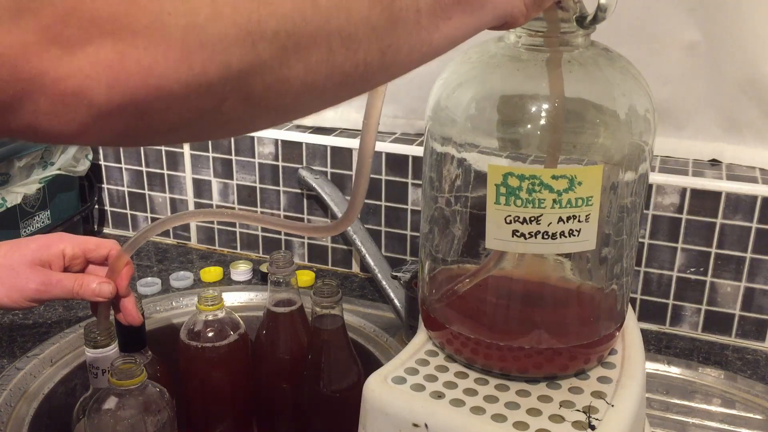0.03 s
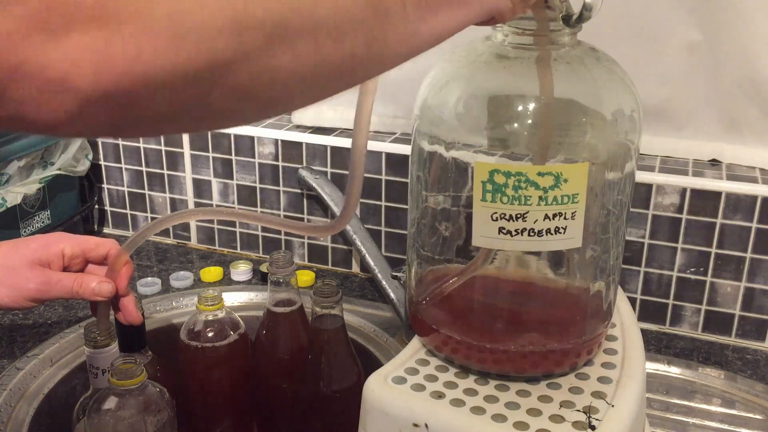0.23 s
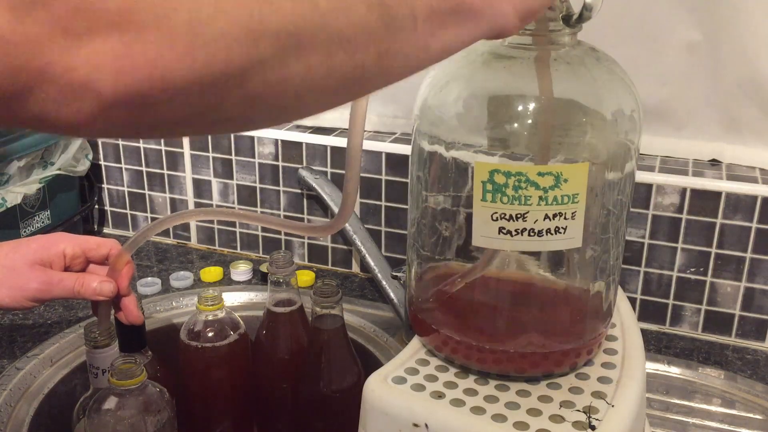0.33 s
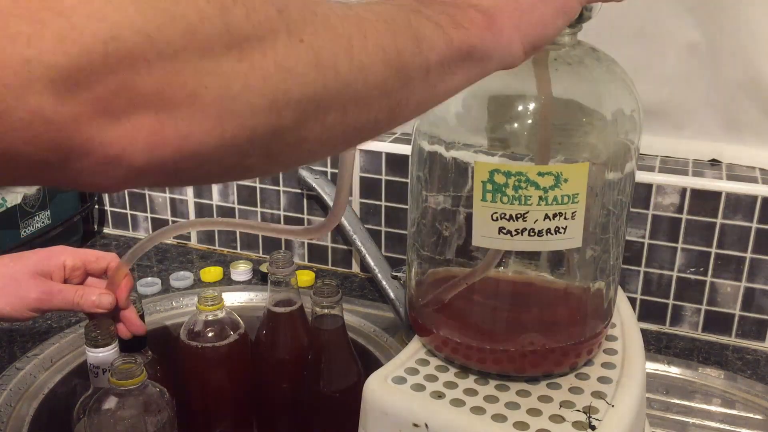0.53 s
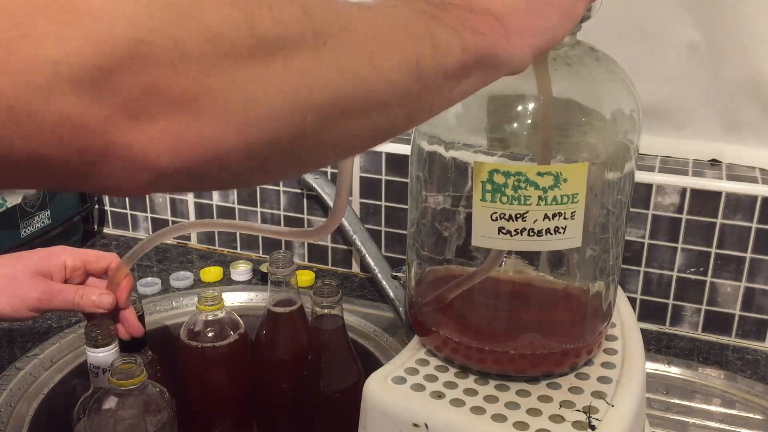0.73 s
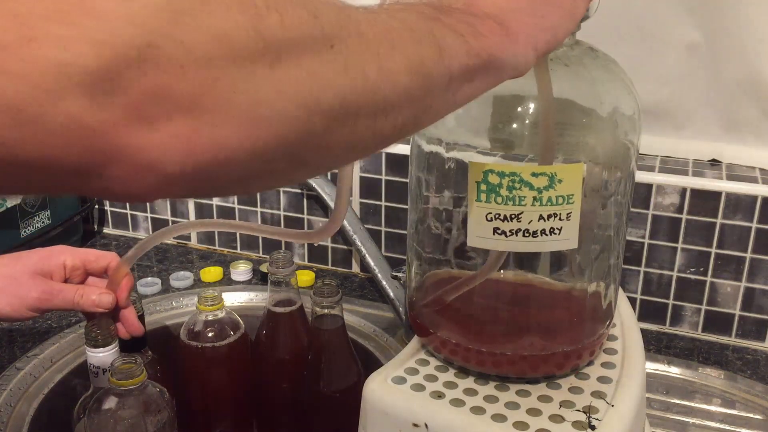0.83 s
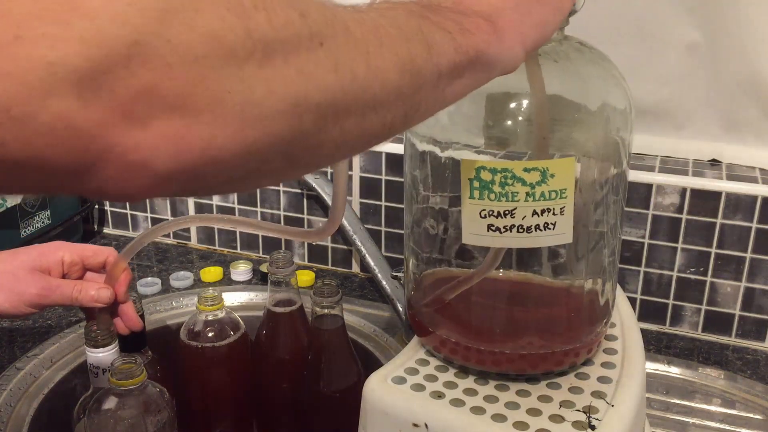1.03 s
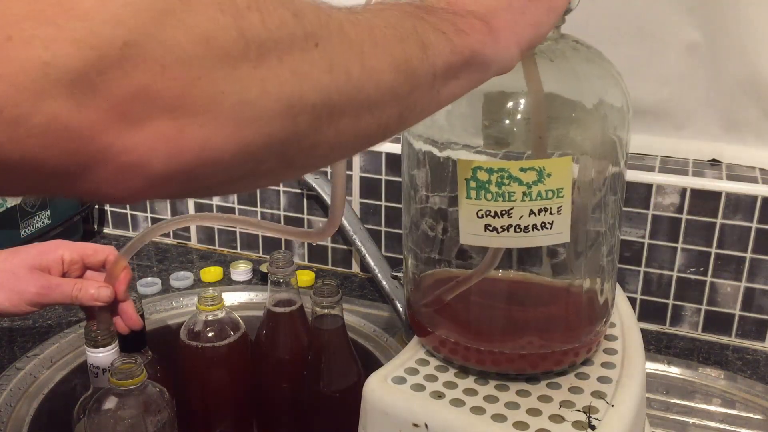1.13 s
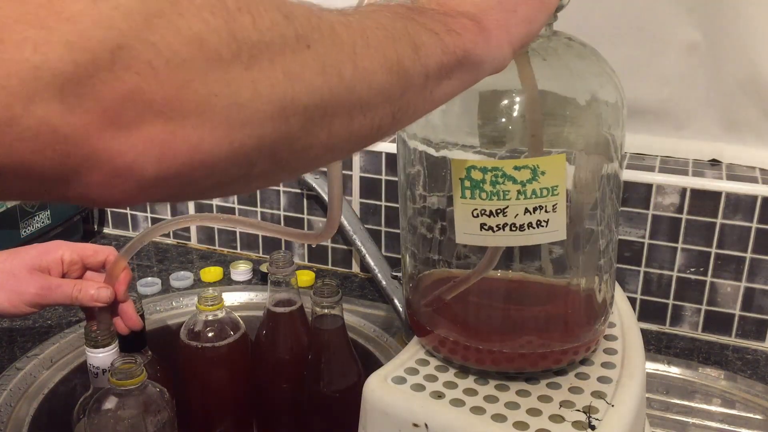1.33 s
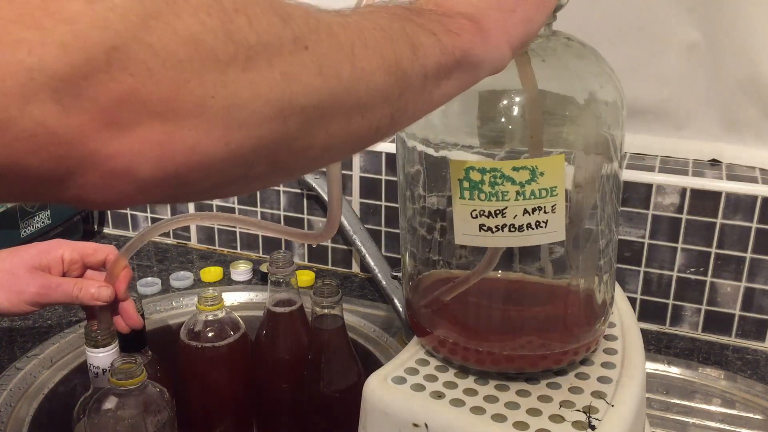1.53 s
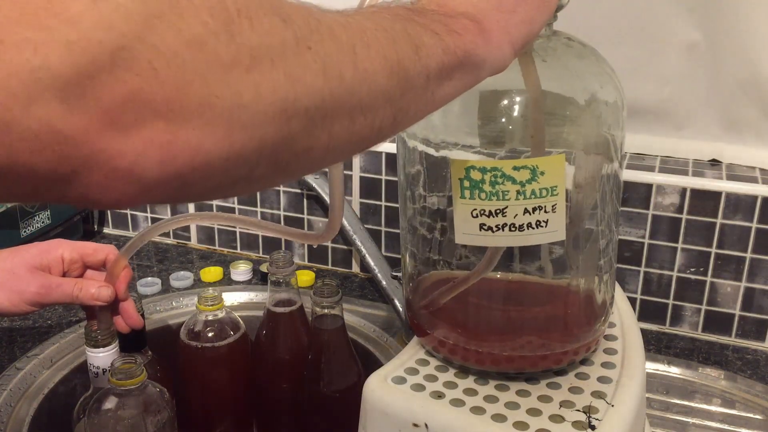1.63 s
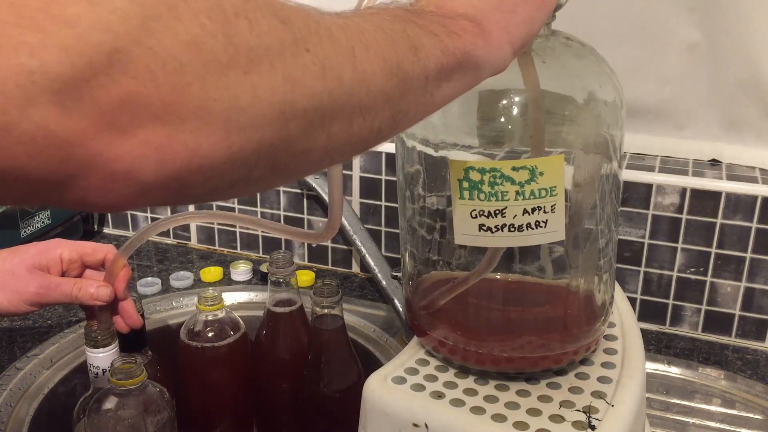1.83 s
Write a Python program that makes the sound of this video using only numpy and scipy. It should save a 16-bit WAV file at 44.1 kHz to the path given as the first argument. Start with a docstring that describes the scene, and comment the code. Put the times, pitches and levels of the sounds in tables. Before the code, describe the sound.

A siphon tube gives one soft, hollow bump in a glass jar, then slips against the glass in tiny scraping ticks. A hand brushes faintly. The sounds are close and dry, over a quiet kitchen appliance hum.

```python
"""A siphon tube in a glass jar

In a quiet kitchen, an appliance hums on one steady note over a low murmur and faint hiss.
Someone holds a siphon tube in a jar: one soft, hollow bump, then two thin, wet crackles.
The tube slips and rubs the glass into tiny scraping ticks, and the hand shifts its grip."""
import sys
import numpy as np
from scipy import signal
from scipy.fft import rfft, irfft
from scipy.io import wavfile

SR = 44100
rng = np.random.default_rng(int(sys.argv[2]) if len(sys.argv) > 2 else 0)


def store_wav(level_fs):
    """Save 16-bit WAV to argv[1]."""
    pcm = np.round(np.clip(np.atleast_2d(level_fs), -1, 1) * 32767)
    wavfile.write(sys.argv[1], SR, pcm.T.astype(np.int16))


N = 83790


def undb(db):
    """Turn decibels (dB) into a number to multiply a sound by."""
    return 10 ** (np.asarray(db) / 20)


def noise(gain):
    """Noise with an overall strength of 1; gain(Hz) sets the share of each frequency."""
    hz = np.maximum(np.arange(N // 2 + 1) * SR / N, 1)
    shaped = irfft(rfft(rng.standard_normal(N)) * gain(hz), N)
    return shaped / np.std(shaped)


def band(hz, width_hz):
    """Noise gathered around one pitch, falling off steeply on both sides."""
    return noise(lambda f: 1 / (1 + ((f * f - hz * hz) / (f * width_hz * 2)) ** 2 * 2))


def wander(rate_hz):
    """A random drift, about 1 in size; a higher rate moves faster."""
    return noise(lambda f: 1 / (1 + (f / rate_hz) ** 2))


def swell(t, rise_s, decay_s, round_s):
    """The loudness of a soft touch: it grows to a rounded peak at t = 0, then dies away."""
    return np.exp(-(np.hypot(t, round_s) - round_s) / np.where(t < 0, rise_s, decay_s))


def tone(t, hz):
    """A pure tone that starts anywhere in its cycle."""
    return np.sin(2 * np.pi * (hz * t + rng.random()))


def appliance_hum(t):
    """An appliance holds one steady note, with two quieter, wavering tones beside it."""
    # Each row: pitch in Hz, level in dB, how far the pitch wavers in Hz.
    hum_tones = [(258.2, -55, 0.23), (100.2, -62.5, 5.83), (386.7, -71, 7.75)]
    hum = np.zeros(N)
    for hz, db, waver_hz in hum_tones:
        drift_s = np.cumsum(waver_hz * wander(13.23)) / SR / hz
        strength = undb(db + 0.93 * wander(2.2))
        hum += np.sqrt(2) * strength * tone(t + drift_s, hz)
    return hum


def murmur():
    """A low murmur: noise gathered around three pitches."""
    # Each row: pitch in Hz, width in Hz, level in dB.
    resonances = [(162, 27, -67), (381.4, 54, -79), (534.2, 10, -77)]
    return sum(undb(db) * band(hz, width_hz) for hz, width_hz, db in resonances)


def room_air():
    """The room's air: a faint rumble and hiss whose level flickers slightly."""
    # Each row: frequency in Hz, level in dB compared with the other rows.
    air_shape = [(18, 0), (40, 0.5), (75, 5), (270, 1.5), (325, -4), (460, -5), (720, -3), (1050, -7.5),
                 (1550, -10), (2900, -10.5), (4300, -15), (4900, -18), (5400, -16.5), (6600, -17.5),
                 (7650, -21.5), (8400, -19.5), (9700, -20.5), (10400, -26.5), (11200, -22.5),
                 (15500, -26.5)]
    hz, db = np.array(air_shape).T
    air = noise(lambda f: undb(np.interp(np.log(f), np.log(hz), db)))
    return air * undb(-58.5 + 0.5 * wander(17))


def jar_bump(t):
    """A padded knock makes the jar ring briefly, with a deep thud and a slight scuff."""
    # Each row is one ringing tone: pitch in Hz, relative level in dB, rise and decay in seconds.
    jar_tones = [(237, -1, 0.0069, 0.0048), (183.5, -12.5, 0.0099, 0.0059), (296, -14, 0.0038, 0.011),
                 (389, -19, 0.011, 0.0029), (474, -29, 0.0087, 0.0076), (582, -29.5, 0.003, 0.0038),
                 (673, -27, 0.0027, 0.0051), (935, -31.5, 0.0066, 0.0046), (1105, -30.5, 0.0056, 0.0024),
                 (1226, -30.5, 0.0042, 0.0097)]
    peak_s, round_s, thud_hz = 0.2203, 0.0035, 47
    t = t - peak_s
    body = np.zeros(N)
    for hz, db, rise, decay in jar_tones:
        # Low tones move together with the push; higher ones ring freely.
        ring = np.cos(2 * np.pi * hz * t) if hz < 350 else tone(t, hz)
        body += undb(db) * swell(t, rise, decay, round_s) * ring
    thud = swell(t - 0.008, 0.014, 0.015, round_s) * np.sin(2 * np.pi * thud_hz * t)
    scuff = swell(t, 0.011, 0.011, round_s) * band(2770, width_hz=1000)
    return undb(-20.5) * body + undb(-40) * thud + undb(-60.5) * scuff


def bursts(t, rows, width_hz):
    """One short puff of noise for each row, rising and fading at the same speed."""
    return sum(undb(db) * swell(t - peak_s, fade_s, fade_s, fade_s) * band(hz, width_hz)
               for peak_s, db, fade_s, hz in rows)


def wet_crackles(t):
    """The wet tube gives two thin, high crackles."""
    # Each row: peak time in seconds, level in dB, fade in seconds, pitch in Hz.
    crackles = [(.325, -74, .008, 13200), (.339, -62.5, 0.0031, 9480)]
    return bursts(t, crackles, width_hz=860)


def tube_slips(t):
    """Each slip of the tube on the glass rubs out a short, rough ring with a little rasp."""
    # Each row is one tone of the tube and glass: pitch in Hz, relative level in dB.
    tube_tones = [(1160, -6), (1620, -3.5), (1830, -25), (2190, -14), (2730, -3), (2860, -9.5),
                  (3118, -10.5), (3350, -10.5), (4380, -22), (5400, -21), (5700, -12), (6350, -14),
                  (7300, -14)]
    # Each row: peak time in seconds, level in dB, rise and decay in seconds, middle pitch in Hz,
    # spread around that pitch in octaves, rasp level in dB compared with the ring.
    slips = [(.632, -63, 0.003, 0.0065, 2800, .1, -1), (.674, -74, 0.0044, 0.0065, 7300, 0.11, 1),
             (0.685, -69, 0.023, 0.018, 4400, 0.13, 1.5), (0.776, -55.5, 0.0044, 0.005, 2780, 0.42, -14),
             (0.808, -57, 0.0035, 0.003, 2240, 0.1, 1), (0.817, -46, 0.0091, 0.0052, 1620, 0.23, -19),
             (.861, -56, 0.0058, 0.0038, 2900, 0.046, -16), (.953, -66, .007, 0.0089, 6500, 0.18, -4),
             (.956, -60, 0.014, 0.012, 3120, 0.074, -1), (0.977, -59, 0.0029, 0.0064, 5230, 0.11, -6),
             (0.982, -47, 0.0044, .006, 1500, 0.5, -14)]
    roughness, rasp_octaves = 0.22, 0.55
    tone_hz, tone_db = np.array(tube_tones).T
    rings = np.array([np.sqrt(2) * tone(t, hz) + roughness * band(hz, width_hz=90) for hz in tone_hz])
    ticks = np.zeros(N)
    for peak_s, db, rise, decay, middle_hz, spread, rasp_db in slips:
        # A slip favours the tones near its middle pitch.
        weights = undb(tone_db) * np.exp(-0.5 * (np.log2(tone_hz / middle_hz) / spread) ** 2)
        ring = weights @ rings / np.linalg.norm(weights)
        rasp = noise(lambda f: np.exp(-0.5 * (np.log2(f / middle_hz) / rasp_octaves) ** 2))
        loudness = undb(db) * swell(t - peak_s, rise, decay, round_s=0.0015)
        ticks += loudness * (ring + undb(rasp_db) * rasp)
    return ticks


def hand_rubs(t):
    """The hand shifts its grip with two dull brushing sounds."""
    # Each row: peak time in seconds, level in dB, fade in seconds, pitch in Hz.
    rubs = [(0.979, -60, 0.015, 345), (1.149, -57, 0.019, 325)]
    return bursts(t, rubs, width_hz=130)


def scene():
    """Close handling sounds with no echo, over the kitchen's hum, in one channel."""
    t = np.arange(N) / SR
    kitchen = appliance_hum(t) + murmur() + room_air()
    handling = jar_bump(t) + wet_crackles(t) + tube_slips(t) + hand_rubs(t)
    return (kitchen + handling)[None]


def record(dry):
    """Cut away the very highest treble steeply."""
    top_hz = 15700
    treble_cut = signal.ellip(12, 0.1, 70, top_hz, fs=SR, output="sos")
    return signal.sosfilt(treble_cut, dry)


dry = scene()
out = record(dry)
store_wav(out)
```